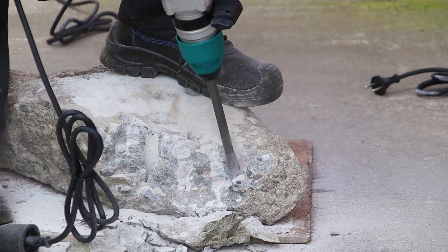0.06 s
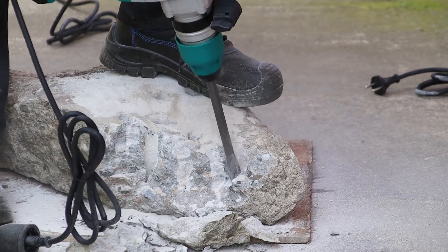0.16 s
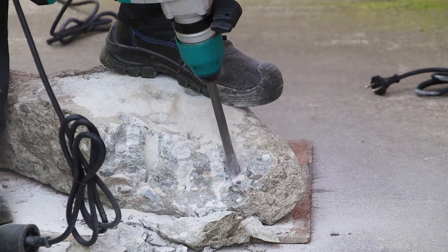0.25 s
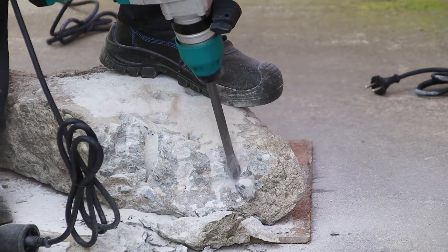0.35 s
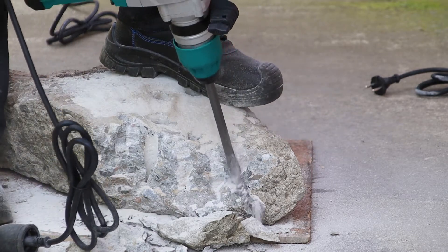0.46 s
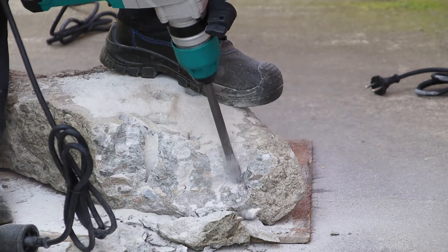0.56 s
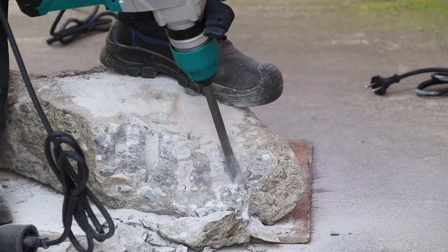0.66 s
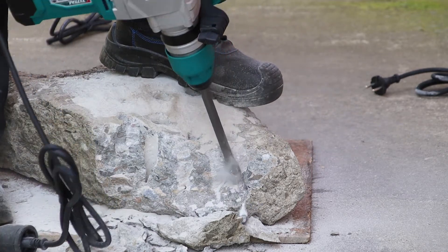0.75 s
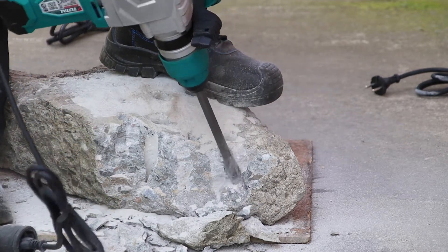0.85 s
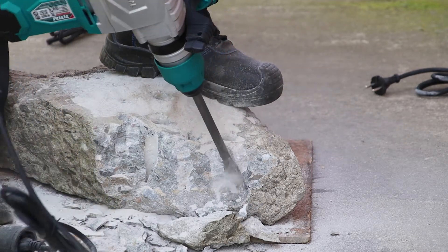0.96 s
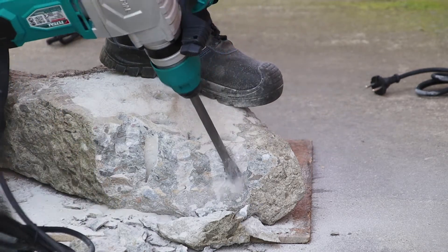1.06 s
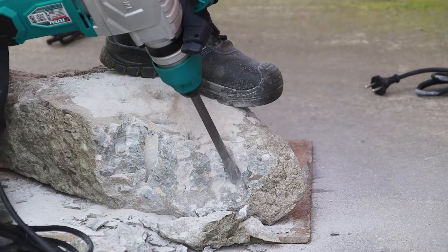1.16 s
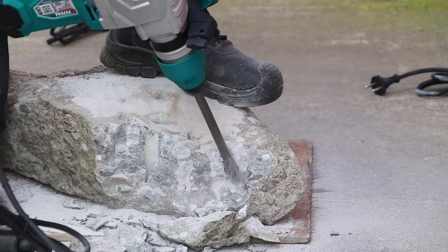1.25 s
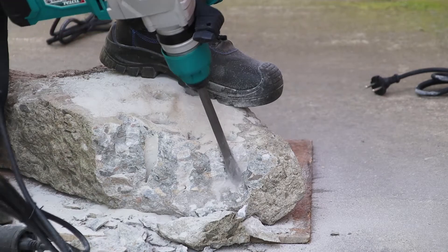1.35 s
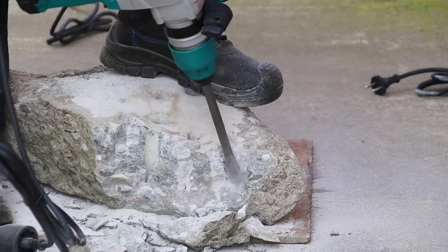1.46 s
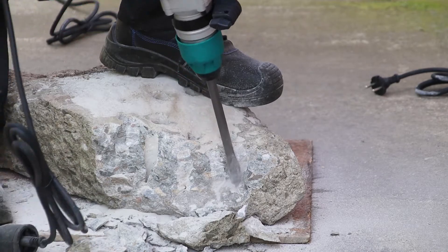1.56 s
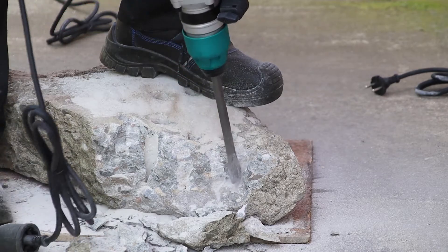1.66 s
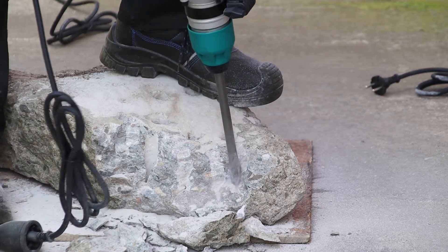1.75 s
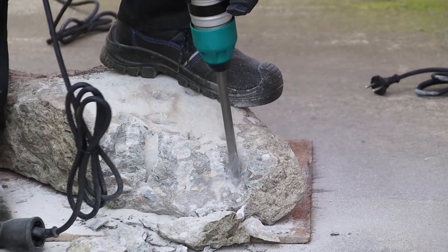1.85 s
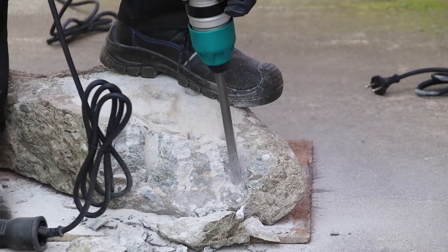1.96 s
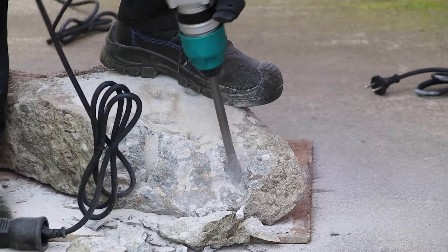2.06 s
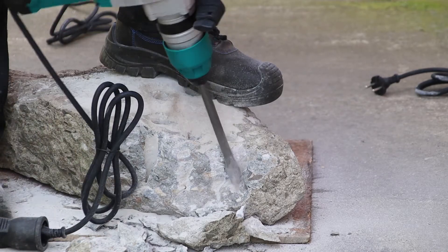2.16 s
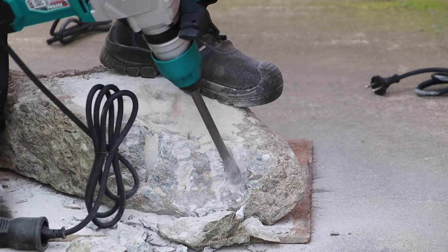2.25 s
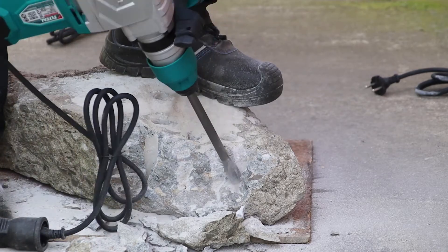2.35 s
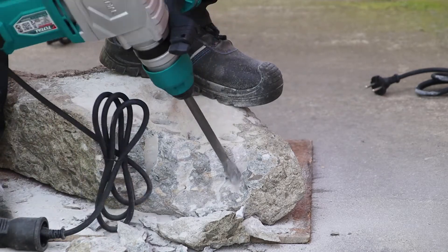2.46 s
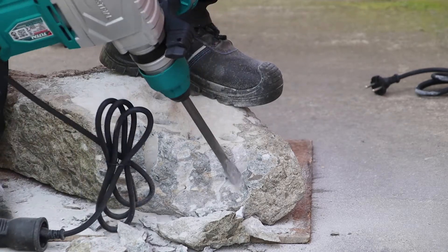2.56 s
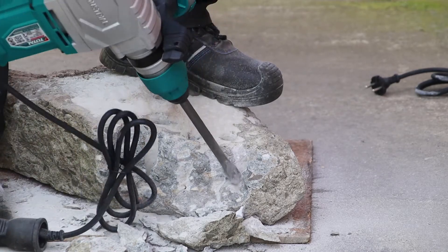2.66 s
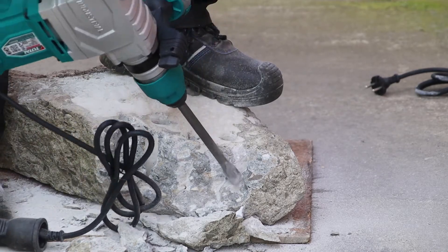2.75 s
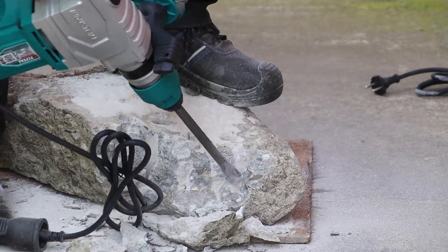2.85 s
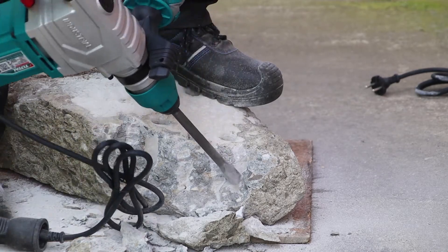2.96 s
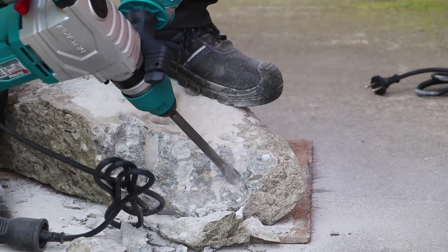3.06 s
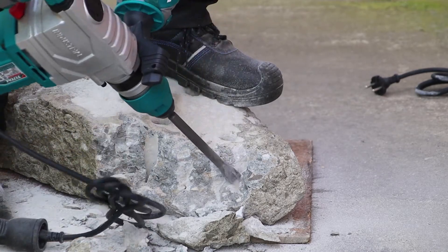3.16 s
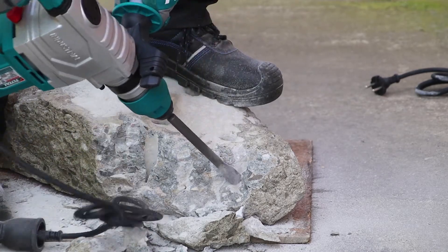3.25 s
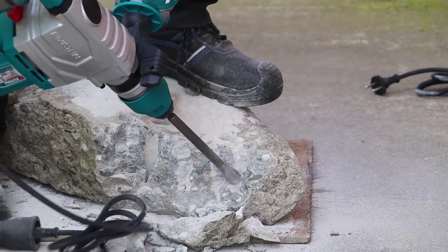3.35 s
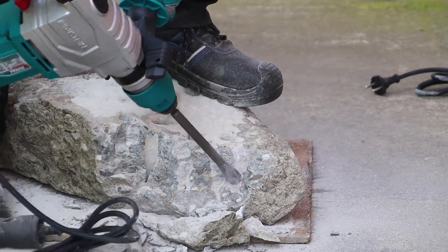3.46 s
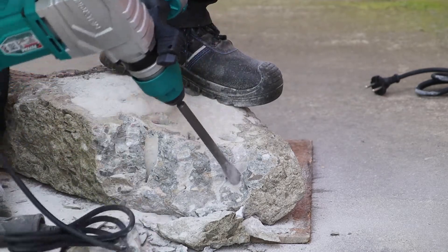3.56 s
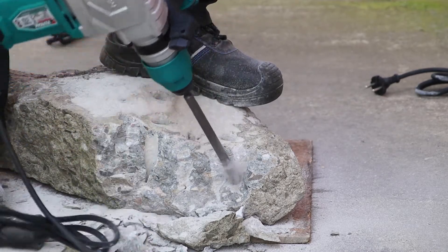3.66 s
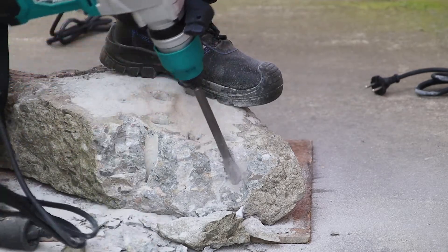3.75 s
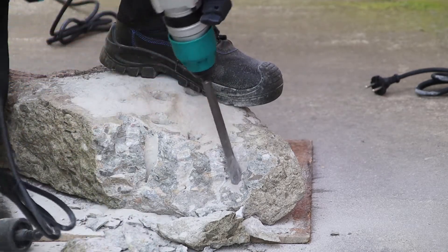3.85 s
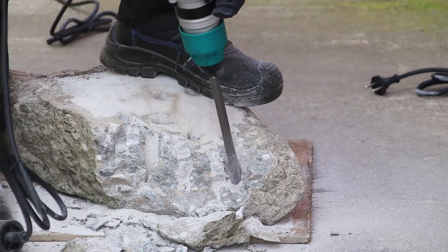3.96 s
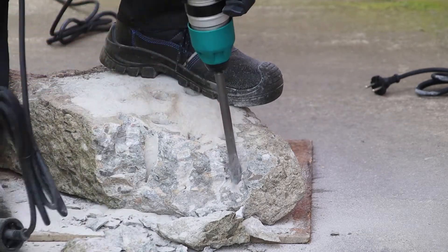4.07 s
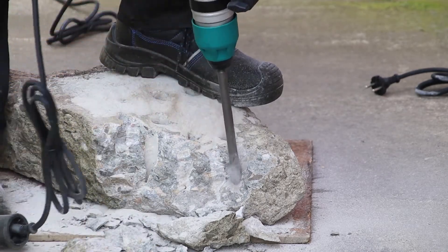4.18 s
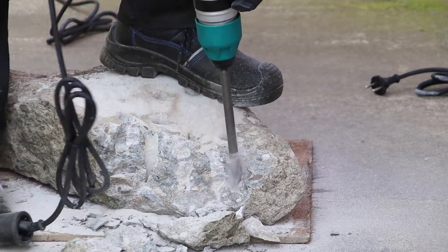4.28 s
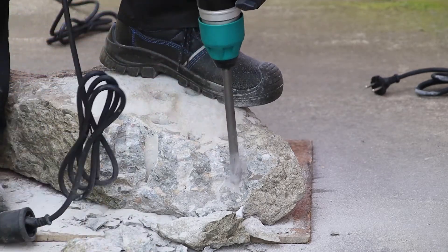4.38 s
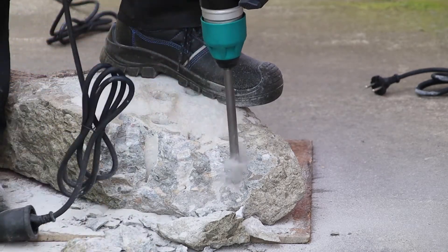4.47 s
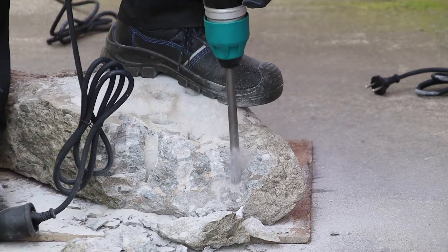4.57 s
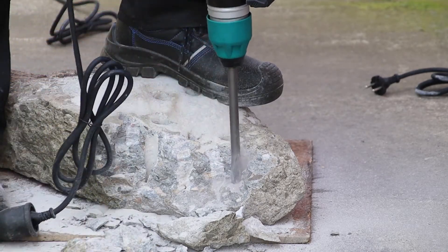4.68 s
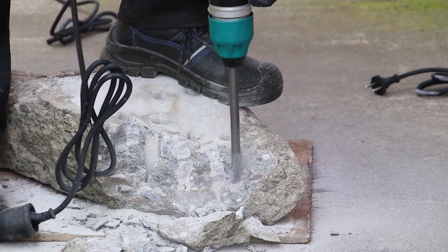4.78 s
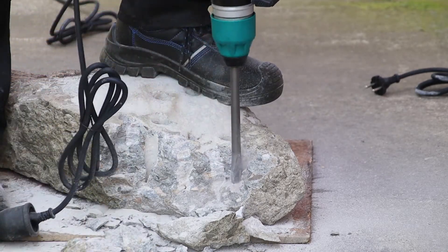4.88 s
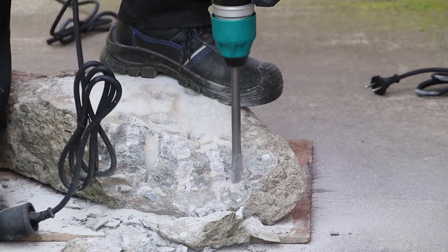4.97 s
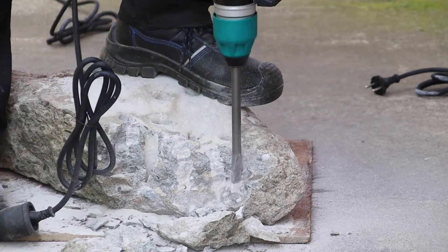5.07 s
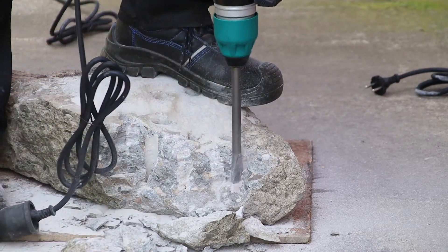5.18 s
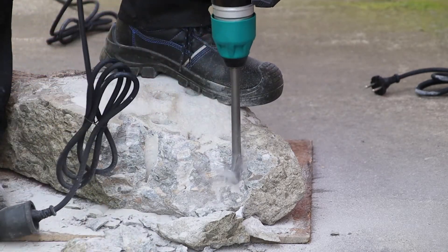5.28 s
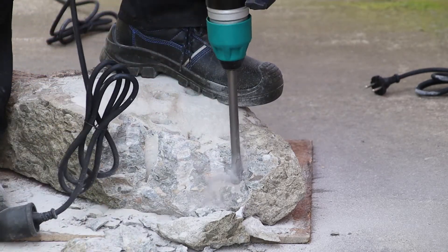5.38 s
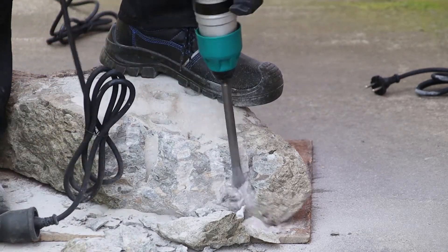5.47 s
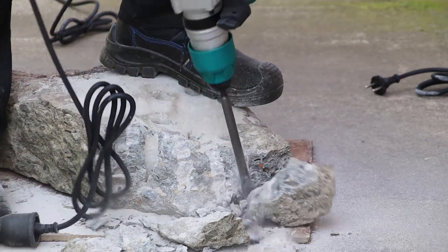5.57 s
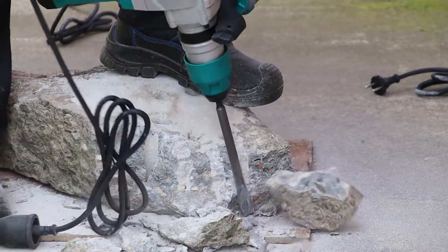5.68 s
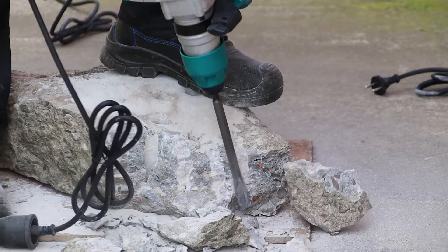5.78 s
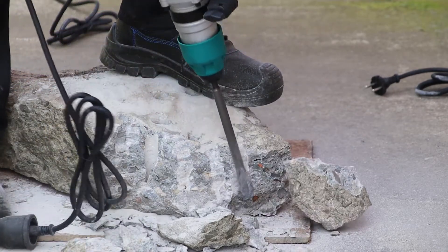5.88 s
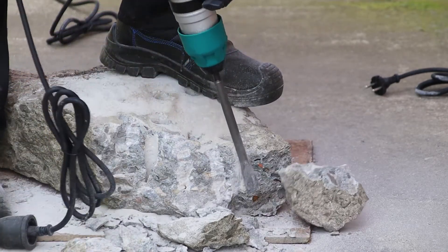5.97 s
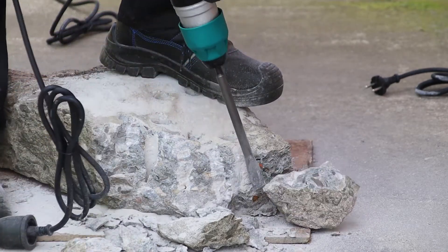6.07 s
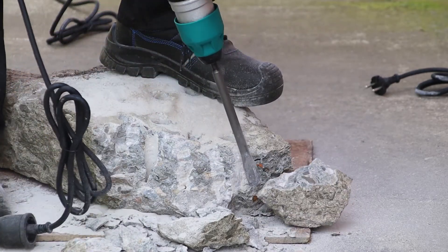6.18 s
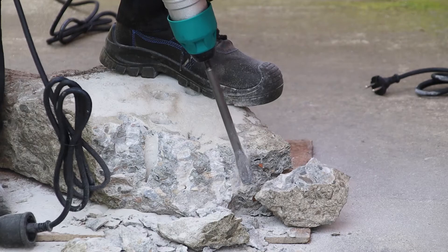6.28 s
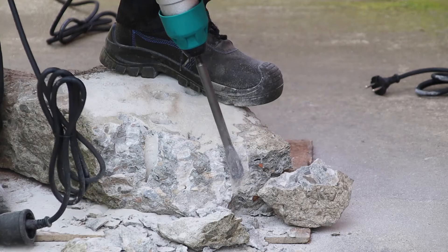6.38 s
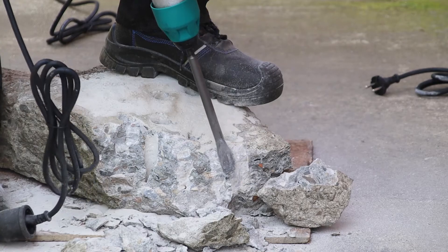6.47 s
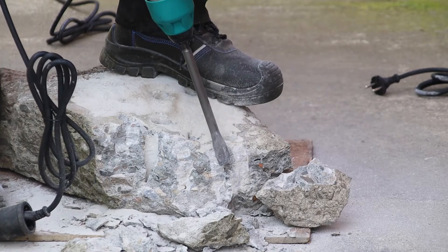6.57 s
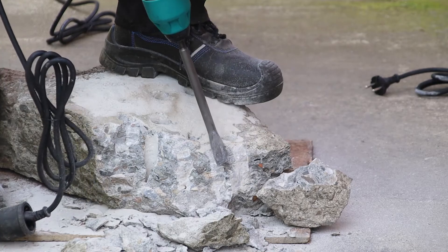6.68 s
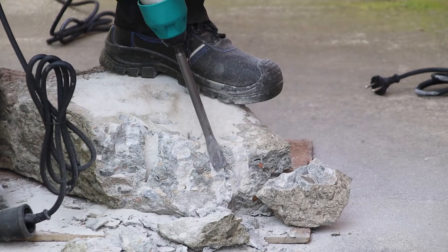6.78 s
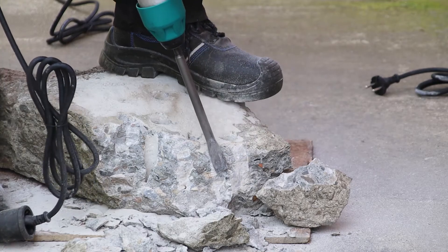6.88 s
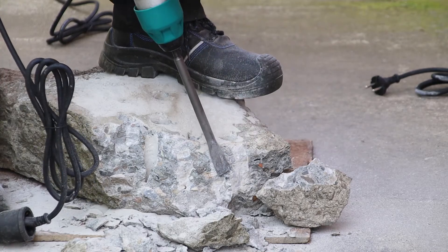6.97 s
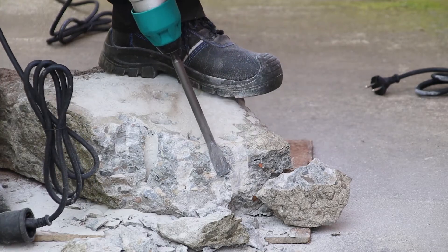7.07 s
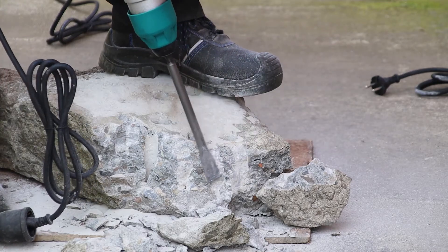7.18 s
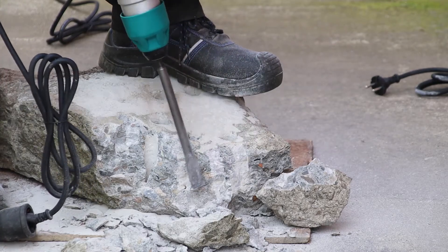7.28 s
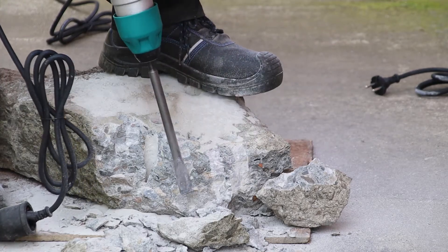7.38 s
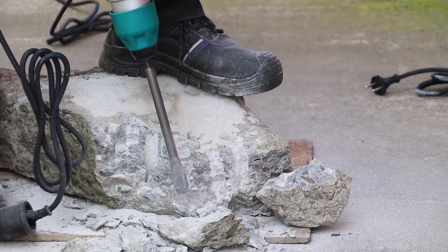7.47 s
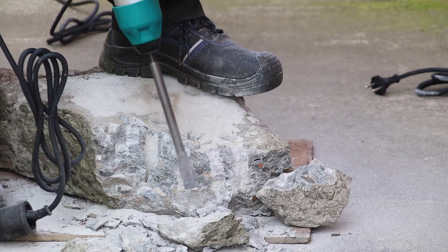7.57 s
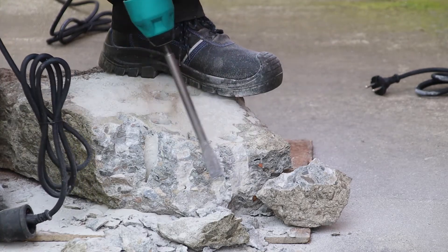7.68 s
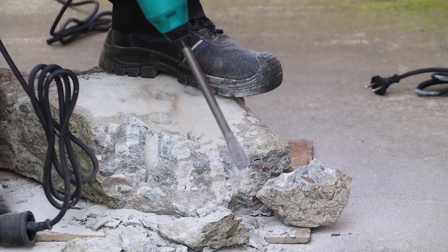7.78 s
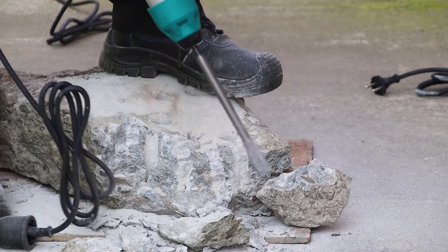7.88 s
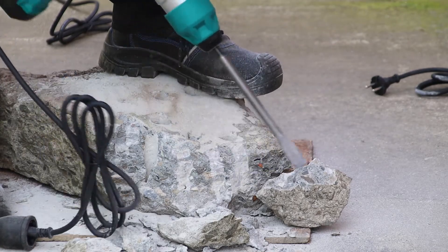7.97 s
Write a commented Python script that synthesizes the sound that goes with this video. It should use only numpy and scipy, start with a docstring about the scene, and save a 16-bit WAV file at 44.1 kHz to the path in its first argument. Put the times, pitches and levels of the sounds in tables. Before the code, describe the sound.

From 0 to 3.8 seconds an electric rotary hammer chisels rock close by outdoors, in stereo: about 56 blows a second merge into a harsh, gritty rattle, with bright steel ringing, short stone tones, buzzing housing, motor whine and rushing fan air. Tone and force vary as the tool tilts, becoming rougher and less even around 2.3 to 3.5; two dull bumps hide near 1. At 3.8 the blows stop and the motor races freely for 0.3 seconds. Hammering resumes at 4.1, firmer and louder, then weakens from 5.4 as the stone splits. Around 5.55 a lump snaps off with a cluster of sharp stony clacks. The motor briefly speeds up, then from 5.85 coasts down, its whine falling, with light rapid ticking slowing until about 6.8. A faint squeak at 7.2 marks the stop. Quiet open air remains, with a soft low rumble and faint hum from 7.7 and tiny clicks near 7.9 and 8.

```python
"""Fast hammer blows crack on stone: an electric rotary hammer chisels a rock block outdoors, close by in stereo.
One crank sets the pace: each turn on the rock, noise bursts make the crack and decaying tones ring steel and stone.
Sine waves tied to the crank shake the housing and make the motor whine; filtered noise makes the fan air and brush rasp.
Off the rock the motor races. A lump breaks off, the trigger is let go, and the motor coasts to a stop
with a ticking striker and a last squeak. Quiet open air lies beneath, with a low rumble and faint hum near the end."""
import sys
import numpy as np
from scipy import signal
from scipy.fft import rfft, irfft
from scipy.io import wavfile
from scipy.ndimage import uniform_filter1d

SR = 44100
rng = np.random.default_rng(int(sys.argv[2]) if len(sys.argv) > 2 else 0)


def log_audio(samples):
    """Write samples as a 16-bit WAV file to the path given in sys.argv[1]."""
    # one column per channel
    frames = np.atleast_2d(samples).T
    # limit to full scale, then quantise
    limited = np.clip(frames, -1, 1)
    pcm = np.round(limited * 32767).astype(np.int16)
    wavfile.write(sys.argv[1], SR, pcm)


N = 354123
TIME = np.arange(N) / SR
# half a left-right difference for each ear: left, then right
EARS = np.array([[.5], [-.5]])
# crank speed at which the motor's levels are given (turns per second)
WORKING_HZ = 56
# highest frequency kept in this sound (Hz)
TOP_HZ = 15850


def undb(db):
    """Turn decibels into gain."""
    return 10 ** (np.asarray(db) / 20)


def unit(x):
    """Scale to an average (rms) strength of 1."""
    return x / np.sqrt(np.mean(x ** 2) + 1e-20)


def curve(rows, order=1):
    """Join one column of a table by straight lines in time."""
    rows = np.array(rows, float)
    return np.interp(TIME, rows[:, 0], rows[:, order])


def ring(x, response):
    """Let every sample of a signal set off the given response."""
    return signal.oaconvolve(np.atleast_2d(x), np.atleast_2d(response), axes=1)[:, :N]


def colour(x, points):
    """Filter to a (frequency [Hz], level [dB]) spectrum, with no sound ahead of its cause."""
    hz, db = np.transpose(points)
    size = 4096
    grid = np.maximum(np.arange(size // 2 + 1) * SR / size, 1)
    level_db = np.interp(np.log(grid), np.log(hz), db)
    # folding the cepstrum forward gives the minimum-phase response
    cepstrum = irfft(np.log(undb(level_db)))
    cepstrum[1:size // 2] *= 2
    cepstrum[size // 2 + 1:] = 0
    return ring(x, irfft(np.exp(rfft(cepstrum))))


def noise(alike_hz=1500):
    """Stereo noise: alike in the bass, unrelated in the treble."""
    mid, side = rng.standard_normal((2, N))
    highpass = signal.butter(1, min(alike_hz, SR / 4), "high", fs=SR, output="sos")
    side = signal.sosfilt(highpass, side)
    return np.array([mid + side, mid - side])


def walk(rate):
    """Random wander around 0 with a spread near 1, given in changes per second."""
    steps = rng.standard_normal(N // 20)
    return np.interp(TIME * rate, np.arange(len(steps)), steps)


def pulses(times, sizes):
    """One-sample pushes at the given times."""
    return np.bincount(np.clip(np.round(times * SR).astype(int), 0, N - 1), sizes, N)


def fade(t60):
    """A quarter second of decay that falls 60 dB in t60 seconds."""
    return undb(-60 * TIME[:SR // 4] / max(t60, 1e-4))


def mode(hz, t60, phase=0):
    """A decaying sine: how one damped resonance answers a push."""
    return fade(t60) * np.sin(2 * np.pi * hz * TIME[:SR // 4] + phase)


def decades(speed, reference_hz=WORKING_HZ):
    """Speed in powers of ten from a reference."""
    return np.log10(speed / reference_hz + 1e-6)


# when the chisel is pressed on the rock: (from [s], to [s])
PRESSED = [(0, 3.82), (4.125, 5.545)]


def pressed(times):
    """True while the chisel is on the rock."""
    return np.any([(times > a) & (times < b) for a, b in PRESSED], axis=0)


def load(size=900):
    """Motor load: 1 on the rock, 0 off it, with short ramps."""
    return uniform_filter1d(pressed(TIME) * 1., size=size)


# crank speed under load, one blow per turn: (time [s], speed [turns per second])
CRANK = [(0.0, 55.86), (0.6, 56.06), (1.6, 55.97), (2.1, 56.23), (2.28, 54.18), (2.42, 58.28), (2.6, 55.79),
         (3.2, 55.0), (3.65, 57.47), (3.8, 57.21), (4.45, 56.17), (5.0, 56.29), (5.55, 55.72)]
# off the rock: extra turns per second, time to speed up (s), time to be dragged down again (s)
RACE_HZ, RACE_S, DRAG_S = 7.759, .168, .267
# trigger let go (s); dry friction (turns per second lost each second); drag (share lost each second)
SWITCH_OFF_S, FRICTION_HZ_PER_S, DRAG_PER_S = 5.855, 22.644, .763


def crank_speed():
    """Near steady under load, racing when the tip is free, braked by friction and drag once switched off."""
    speed = curve(CRANK)
    landings = [a for a, _ in PRESSED[1:]] + [TIME[-1]]
    for (_, lifted), landed in zip(PRESSED, landings):
        race = 1 - np.exp(-np.maximum(TIME - lifted, 0) / RACE_S)
        dragged = np.clip(1 - (TIME - landed) / DRAG_S, 0, 1)
        speed = speed + RACE_HZ * race * dragged
    brake = FRICTION_HZ_PER_S / DRAG_PER_S
    speed_at_release = np.interp(SWITCH_OFF_S, TIME, speed)
    coast = (speed_at_release + brake) * np.exp(-DRAG_PER_S * (TIME - SWITCH_OFF_S)) - brake
    return np.where(TIME < SWITCH_OFF_S, speed, np.maximum(coast, 0))


# tilt of the tool from upright: (time [s], tilt [degrees])
SLANT = [(0, 10.5), (.6, 19), (1.2, 27.5), (1.75, 7), (2.05, 20), (2.3, 32), (3.25, 48), (3.55, 50),
         (4.0, 0.5), (4.5, 6.5), (5.3, 23.5), (5.9, 28.5)]
# skidding starts at the first tilt and is full at the second (degrees)
SKID_DEGREES = (24, 31)


def skidding():
    """How much the tilted tip skids, 0 to 1."""
    return np.interp(curve(SLANT), SKID_DEGREES, [0, 1])


# the tip needs this long to find its footing after being set down (s)
FOOTING_S = 0.036
# a split opens under the tip from this moment until the tip leaves the rock (s)
SPLIT_S = 5.36


def unfooted():
    """How badly the tip is supported, 0 to 1: just after landing, and as the stone splits under it."""
    landing = sum((TIME > a) * np.clip(1 - (TIME - a) / FOOTING_S, 0, 1) for a, _ in PRESSED[1:])
    return landing + np.interp(TIME, [SPLIT_S, PRESSED[-1][1]], [0, 1])


# how hard the tip is driven into the stone: (time [s], level [dB])
PUSH = [(0, -2), (.33, 1), (.6, -1), (.95, 0), (1.2, -1.5), (2.02, .5), (2.28, -1), (2.38, -5), (2.47, .5),
        (2.9, -2), (3.43, -1.5), (3.56, -3), (3.73, -0.5), (3.82, -3), (4.2, 2.5), (4.8, 2), (5.0, 4.5),
        (5.33, 3.5)]


def strength(law):
    """Gain of one part of the blow, from tilt, push and footing."""
    db, per_degree, share, unfooted_db = law
    return undb(db + per_degree * curve(SLANT) + share * curve(PUSH) + unfooted_db * unfooted())


# timing scatter of the blows (s): always, added at full skid, and added at landing
STEADY_S, SKID_S, LANDING_S = .00002, .00009, .0002
# the landing scatter dies away with this time constant (s)
SETTLE_S = .17


def scatter(times):
    """Blows land unevenly: the tip skids when tilted and dances just after landing."""
    dance = sum((times > a) * np.exp(-np.abs(times - a) / SETTLE_S) for a, _ in PRESSED[1:])
    return STEADY_S + SKID_S * np.interp(times, TIME, skidding()) + LANDING_S * dance


# relative spectrum of the crack: (frequency [Hz], level [dB])
CRACK = [(50, -42), (500, -19.5), (1200, -15.5), (2200, -7.5), (3600, 4.5), (4700, -2.5), (6000, 2),
         (7800, 2.5), (10000, -4), (12400, 0.5), (14000, 0.5), (16000, -4.5)]


def stone_crack(strike, burst, pan_db=-1.2):
    """Crushed stone makes a gritty noise burst; the anvil's clank is alike on every blow."""
    grit = undb(1.1 * walk(3000))
    clank = ring(strike, noise(alike_hz=2500)[:, :SR // 4] * fade(0.046))
    crushed = unit(noise(alike_hz=2480) * burst * grit)
    return unit(colour(crushed + .5 * unit(clank), CRACK) * undb(pan_db * EARS))


# relative spectrum of the knock: (frequency [Hz], level [dB])
KNOCK = [(60, -50.5), (400, -68), (800, -12), (1000, -2), (1450, 4), (2000, 4.5), (3000, -4), (3850, -10.5),
         (4400, -8), (7500, -12.5), (12000, -30)]


def dense_knock(bite, burst):
    """The dense modes of the rock and the tool's housing answer every blow alike, with some noisy clatter on
    top."""
    dense = noise(alike_hz=1100)[:, :SR // 4] * (fade(.016) + .09 * fade(.06))
    clatter = unit(noise(alike_hz=1100) * burst)
    return unit(colour(unit(ring(bite, dense)) + .65 * clatter, KNOCK))


# modes of the rock block: (frequency [Hz], t60 [s], relative level [dB])
BLOCK = [(524, 0.043, 1), (619, 0.043, 2), (792, 0.018, 5.5), (871, 0.0085, 10.5), (964, 0.14, -8),
         (1183, 0.056, -5.5), (1250, 0.032, -1.5), (1460, 0.0033, -12)]


def block_ring(bite):
    """The block answers each bite with short tones, alternating in sign."""
    stone = 0
    for k, (hz, t60, db) in enumerate(BLOCK):
        stone = stone + (-1) ** k * undb(db) * mode(hz, t60, np.pi / 2 - .5 * EARS)
    band = signal.butter(2, [400, 1800], "band", fs=SR, output="sos")
    return unit(signal.sosfilt(band, ring(bite, stone) + 1e-18))


def steel(push, modes):
    """Ring a table of chisel modes; each side hears them with its own level and phase."""
    response = sum(undb(db + pan * EARS) * mode(hz, t60, lead * EARS) for hz, t60, db, pan, lead in modes)
    # a thin bar radiates no bass
    highpass = signal.butter(2, 600, "high", fs=SR, output="sos")
    return unit(signal.sosfilt(highpass, ring(push, response) + 1e-18))


# bending modes of the chisel:
# (frequency [Hz], t60 [s], relative level [dB], left minus right [dB], left lead [radians])
CHISEL = [(1637.4, 0.14, 3.5, 4, -1.27), (1735, 0.27, -19, 16, -1.4), (1790, 0.041, -36.5, -3.5, 0),
          (2517, 0.085, -6, 3.5, 0.069), (2549.6, 0.075, 4, -6.5, 1.5), (2776, 0.066, -12, -24, 0.27)]
# while the tool is steeply tilted, the ring's level wanders at random (dB, changes per second)
WANDER_DB, WANDER_RATE = 2.5, 32


def chisel_ring(bite, scrape):
    """The steel bends and rings on from blow to blow."""
    wander = undb(WANDER_DB * skidding() * walk(WANDER_RATE))
    return steel((unit(bite) + .26 * scrape) * wander, CHISEL)


# short rattling modes of the chisel, strongest when the tip sits firmly, then its highest modes:
# (frequency [Hz], t60 [s], relative level [dB], left minus right [dB], left lead [radians])
RATTLE = [(3543, 0.082, 1.5, -1.1, .94), (3710, 0.076, 0, 1, 0.16), (3828, 0.054, 3, -1.8, 0.16),
          (7590, 0.046, 5, .086, 3.7)]
ZING = [(5620, 0.015, 2.5, -2.5, .8), (12180, 0.021, 8, -3, 0.59), (12520, .012, 6, -6, -0.61),
        (13400, .024, -7, 5, -1.5)]
# balance of these modes: (time [s], balance [0 mostly rattle to 1 mostly zing])
SEAT = [(0, 0.28), (.6, 0.32), (1.05, 1), (2.3, 0.68), (3.2, 0.43), (4.15, 0.72), (4.5, 0.83), (4.65, 0.18),
        (5.28, .1), (5.45, 0.54)]
# rattle against the crack at balance 0; zing base level, before half the range is taken off at balance 1
RATTLE_DB, ZING_DB = -2, 4
# what each loses across the balance; extra zing when the tip loses its footing (dB)
SEAT_RANGE_DB, SPLIT_ZING_DB = 14.5, 27.5


def rattle_and_zing(bite, scrape):
    """The chisel's high modes are shaken by the grit; the seat of the tip decides which ones win."""
    seat = curve(SEAT)
    rattle = steel(0.75 * unit(bite) + scrape, RATTLE) * undb(RATTLE_DB - SEAT_RANGE_DB * seat)
    zing_db = ZING_DB - SEAT_RANGE_DB * (1.5 - seat) + SPLIT_ZING_DB * unfooted()
    return rattle + steel(scrape, ZING) * undb(zing_db)


# housing shake: (multiple of crank speed, relative level when upright [dB], change [dB per degree of tilt])
SHAKE = [(1, -20, 0), (2, -7, -.06), (3, 1.5, -.1), (4, -.5, -.04), (5, -3.5, .08), (6, -3.5, .1),
         (7, -3, .1), (8, -13, 0)]


def housing(turns, idle_db=-9):
    """Piston and blows shake the whole tool; tilt changes the balance of the lagging multiples of the crank."""
    slant = curve(SLANT)
    shake = 0
    for k, db, per_degree in SHAKE:
        phase = 2 * np.pi * k * turns - 1.3 * k ** 2 + .45 * EARS + .12 * walk(30)
        shake = shake + undb(db + per_degree * slant) * np.sin(phase)
    # a weaker shake goes on while the tip is lifted between two spells on the rock
    drive = np.maximum(load(), undb(idle_db) * (TIME < PRESSED[-1][1]))
    return unit(shake * undb(1.4 * EARS + 1.0 * walk(30)) * drive)


# levels of the parts of a blow, one row each:
# (level when upright [dB], change [dB per degree of tilt], share of the push followed, change without footing [dB])
CRACK_LAW = (-41, -0.0133, 1, -20.5)
KNOCK_LAW = (-48, -0.18, 1.5, -6)
BLOCK_LAW = (-53.5, -0.0616, 1.17, -4)
RING_LAW = (-40.5, -0.0119, 1, -15.5)
SHAKE_LAW = (-59.5, 0.0245, 0.73, -7.5)


def hammer(turns, transit_s=.0013, rebound_s=.0098):
    """The striker hits the anvil, the chisel bites the rock a moment later, then bounces back into the chuck."""
    times = np.interp(np.arange(1, turns[-1]), turns, TIME) - .0007
    times = times[pressed(times)]
    chance = rng.standard_normal((len(times), 7)).T
    times = times + scatter(times) * chance[0]
    strike = pulses(times, .85 * undb(1.2 * chance[1]))
    bite = pulses(times + transit_s, undb(.9 * chance[2]))
    crush = pulses(times + transit_s + .0002 * chance[3], undb(1.2 * chance[4]))
    rebound = pulses(times + rebound_s + .0008 * chance[5], undb(3 * chance[6]))
    # a short burst with a weak tail of flying chips
    burst = ring(strike + crush + .24 * rebound, fade(.012) + .09 * fade(.06))
    scrape = unit(noise(alike_hz=2500) * burst)
    sharp = stone_crack(strike, burst) + rattle_and_zing(bite, scrape)
    return (sharp * strength(CRACK_LAW)
            + dense_knock(bite, burst) * strength(KNOCK_LAW)
            + block_ring(bite) * strength(BLOCK_LAW)
            + chisel_ring(bite, scrape) * strength(RING_LAW)
            + housing(turns) * strength(SHAKE_LAW))


# relative spectra of fan air and brush rasp: (frequency [Hz], level [dB])
FAN = [(35, -79.5), (60, -26), (156, -26.5), (189, -33), (315, -15), (408, -18), (540, -12.5), (924, -9),
       (1040, -5), (1510, -4), (2000, -7.5), (2840, -3), (5590, -6.5), (8920, -7), (16000, -18)]
BRUSH = [(200, -30.5), (300, -35), (570, -12), (860, -17), (990, -2), (1330, -17.5), (1550, -4.5),
         (1800, -10), (2550, -5), (3250, -9.5), (4300, -15.5), (5300, -20), (8400, -25.5), (16000, -38)]
# cooling air: level (dB), growth per tenfold speed (dB), change per degree of tilt (dB), share of the push followed
AIR_DB, AIR_SPEED_DB, AIR_DB_PER_DEGREE, AIR_PUSH_SHARE = -38, 29, -0.0779, 0.59
# brush rasp: level (dB), extra under load (dB), speed below which it dies (turns per second)
RUB_DB, RUB_LOAD_DB, RUB_STALL_HZ = -53, 4.5, 3.1


def motor(turns, speed, flutter_db=1.0, churn=0.018, tail_s=0.026):
    """Fan air grows with speed, brushes rasp until the rotor stalls and the casing dies away; both swell each turn."""
    beat = (1 + churn * np.cos(2 * np.pi * turns)) * undb(flutter_db * walk(400))
    air_db = AIR_DB + AIR_SPEED_DB * decades(speed) + AIR_DB_PER_DEGREE * curve(SLANT)
    air_db = air_db + AIR_PUSH_SHARE * curve(PUSH) * load()
    air = unit(colour(noise(alike_hz=1790), FAN)) * undb(air_db)
    # smoothing lets the rasp die away instead of stopping dead
    keep = np.exp(-1 / (SR * max(tail_s, 1e-3)))
    turning = signal.lfilter([1 - keep], [1, -keep], np.minimum(speed / RUB_STALL_HZ, 1))
    rub = unit(colour(noise(alike_hz=1400), BRUSH)) * undb(RUB_DB + RUB_LOAD_DB * load()) * turning
    return beat * (air + rub)


# resonances and dips of the motor casing: (frequency [Hz], half width [Hz], level [dB])
CASING = [(2100, 120, 3), (2550, 250, 5), (2900, 130, -6), (4250, 250, -6), (4900, 200, 7), (5400, 200, -6),
          (9150, 300, 4)]
# whine cycles per crank turn
WHINE_ORDER = 146
# level, growth per tenfold speed, change per degree of tilt, change under load (all dB)
WHINE_DB, WHINE_SPEED_DB, WHINE_DB_PER_DEGREE, WHINE_LOAD_DB = -53, 17, 0.17, -5.5
# overtones: base level (dB), pitch above which they fade (Hz), loss (dB per octave)
OVERTONE_DB, OVERTONE_BELOW_HZ, OVERTONE_DB_PER_OCTAVE = 6, 2700, 13
# a reflection from the ground makes the gliding whine swell and dip (lag in s, strength)
GROUND_LAG_S, GROUND_SHARE = .0024, .5
# the coasting rotor runs unevenly, which frays its whine (radians, changes per second)
FRAY_RADIANS, FRAY_RATE = 1.6, 130


def whine(turns, speed, wobble=.85):
    """Commutator bars sing roughly; as they slow, their overtones sweep through the casing's resonances."""
    bars = 2 * np.pi * WHINE_ORDER * turns
    slowed = np.clip(1 - speed / WORKING_HZ, 0, 1)
    tremor = wobble * walk(300) + FRAY_RADIANS * slowed * walk(FRAY_RATE)
    # the moving tool shifts the tone's phase at each ear
    drift = .9 * np.array([walk(25), walk(25)])
    out = 0
    for k in range(1, 5):
        hz = k * WHINE_ORDER * speed
        casing_db = sum(db / (1 + ((hz - centre) / width) ** 2) for centre, width, db in CASING)
        octaves_above = np.log2(np.maximum(hz / OVERTONE_BELOW_HZ, 1))
        overtone_db = OVERTONE_DB - OVERTONE_DB_PER_OCTAVE * octaves_above - k
        ground = np.abs(1 + GROUND_SHARE * np.exp(2j * np.pi * hz * GROUND_LAG_S))
        # the small casing radiates little below 2 kHz; the tone also fades towards TOP_HZ
        reach = np.clip((TOP_HZ - hz) / 6000, 0, 1) * np.clip(hz / 2000, 0, 1) ** 9
        gain = ground * reach * undb(casing_db + (k > 1) * overtone_db + 3 * walk(30))
        out = out + gain * np.sin(k * bars + tremor + drift)
    db = WHINE_DB + WHINE_SPEED_DB * decades(speed)
    db = db + WHINE_DB_PER_DEGREE * curve(SLANT) + WHINE_LOAD_DB * load()
    return out * undb(db + 3 * walk(120))


# relative spectra of the open air and the low rumble: (frequency [Hz], level [dB])
OUTDOORS = [(20, -22), (40, -16), (57, -6), (90, -19), (200, -11.5), (380, -10), (500, -8.5), (800, -6),
            (3000, -18.5), (8000, -26.5), (16000, -30)]
RUMBLE = [(30, -20.5), (120, -28), (173, -8.5), (240, -17), (400, -21.5), (640, -25), (750, -28),
          (1260, -30), (2000, -40), (5000, -46), (16000, -55)]
# the rumble swells as the tool is lifted away: (time [s], level [dB])
LIFT = [(7.35, -79), (7.7, -69.5), (7.76, -60.5), (8.03, -60.5)]
# a faint hum beneath it, before its swell: (frequency [Hz], level [dB])
HUM = [(632, -71.5), (1900, -78.5)]


def background():
    """Filtered noise makes quiet open air and a rumble; unsteady sines hum, both swelling near the end."""
    floor = unit(colour(noise(alike_hz=40), OUTDOORS)) * undb(-70 + walk(2.3))
    boom = unit(ring(noise(alike_hz=400), mode(165, .11)))
    rumble = unit(colour(noise(alike_hz=400), RUMBLE)) + 0.7 * boom
    swell = np.interp(TIME, [7.5, 7.7, 7.88, 8.03], [0.031, 1, 0.81, .2])
    hum = sum(undb(db) * np.sin(2 * np.pi * hz * TIME + walk(25)) for hz, db in HUM)
    return floor + unit(rumble) * undb(curve(LIFT)) + swell * hum


def bumps():
    """Two dull bumps under the hammering: opposite pushes on three short, low tones."""
    push = pulses(np.array([.9605, .9785]), np.array([-1, .7]))
    thud = mode(133, 0.014, np.pi / 2) + 0.4 * mode(370, 0.005) + 0.28 * mode(800, .008)
    return undb(-34.5) * ring(push, thud)


# the lump cracks off and lands: (time [s], peak level before a 2.5 dB lift and bass cut [dB], ring [Hz])
BREAKS = [(5.538, -26.5, 2850), (5.555, -23, 2910), (5.574, -17, 3120), (5.594, -26, 3110)]


def breaking(low_hz=500):
    """The lump snaps off and clacks down: short noise cracks with a stony ring."""
    out = 0
    for s, db, hz in BREAKS:
        double_push = pulses(np.array([s, s + .0012]), np.array([.5, 1]))
        burst = noise(alike_hz=4000) * ring(double_push, fade(.017))
        tones = mode(hz, 0.011) + .9 * mode(1.15 * hz, 0.0088) + 0.46 * mode(7200, 0.018)
        clack = unit(ring(burst, tones)) + 1.4 * unit(colour(burst, CRACK))
        out = out + clack / np.abs(clack).max() * undb(db + 2.5)
    return signal.sosfilt(signal.butter(2, low_hz, "high", fs=SR, output="sos"), out + 1e-18)


# the loose chisel clicks in the chuck as the tool is lifted: (time [s], level [dB])
TICKS = [(7.907, -60.5), (7.977, -64)]
# the free striker taps between these speeds (turns per second), at this point of the turn
TICK_SPEEDS_HZ, TICK_TURN = (15.2, 39), .522
# its level at the top of that range (dB) and growth per tenfold speed (dB)
TICK_DB, TICK_SPEED_DB = -40, 14


def ticking(turns, speed):
    """The free striker taps in its tube once a turn while coasting; later the chisel clicks in the chuck."""
    slow, fast = TICK_SPEEDS_HZ
    times = np.interp(np.arange(TICK_TURN, turns[-1]), turns, TIME)
    rates = np.interp(times, TIME, speed)
    tapping = (rates > slow) * (rates < fast)
    taps = pulses(times, tapping * undb(TICK_DB + TICK_SPEED_DB * decades(rates, fast)))
    s, db = np.transpose(TICKS)
    burst = ring(taps + pulses(s, undb(db)), fade(0.061))
    spectrum = [(200, -15), (500, -1), (1200, 10.0), (3500, 7.0), (8000, 1.5), (11000, -1.0), (16000, -22)]
    return unit(colour(noise(), spectrum)) * burst


def squeak(hz=2570, t60=0.024, db=-55):
    """As the motor slows to a stop, the brushes chatter on one casing resonance."""
    swell = np.interp(TIME, [7.1, 7.16, 7.22, 7.33], [0, 1, 1, 0])
    return unit(ring(noise(), mode(hz, t60))) * swell * undb(db)


# point of the turn at which the crank starts (turns)
CRANK_START = .166


def scene():
    """Add everything the crank drives, the stone and the open air."""
    speed = crank_speed()
    turns = CRANK_START + np.cumsum(speed) / SR
    return (hammer(turns) + motor(turns, speed) + whine(turns, speed) + background() + bumps()
            + breaking() + ticking(turns, speed) + squeak())


def record(dry):
    """Cut the treble steeply above the highest frequency kept."""
    return signal.sosfilt(signal.ellip(12, .1, 85, TOP_HZ, fs=SR, output="sos"), dry)


dry = scene()
out = record(dry)
log_audio(out)
```